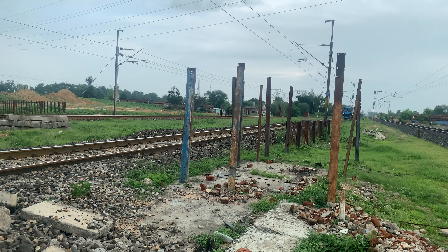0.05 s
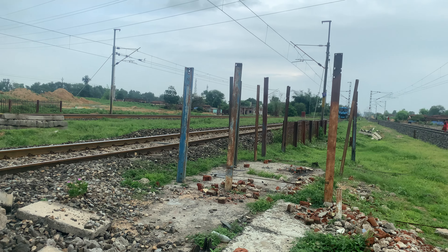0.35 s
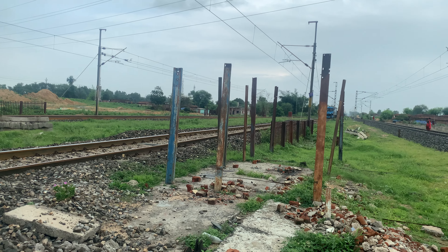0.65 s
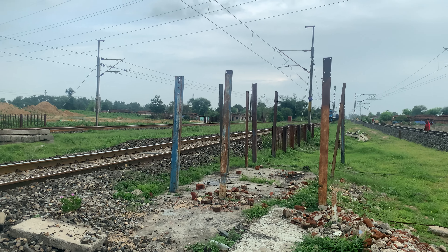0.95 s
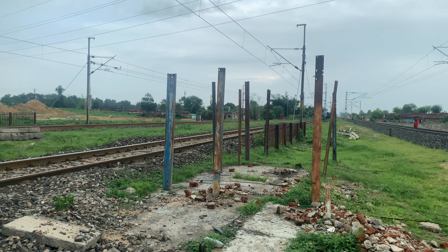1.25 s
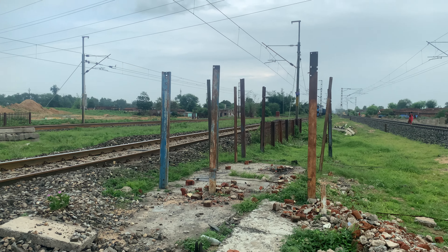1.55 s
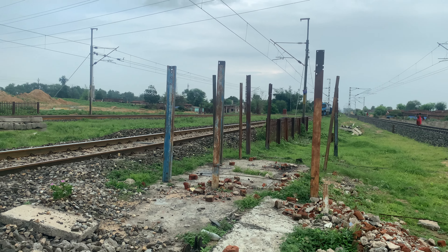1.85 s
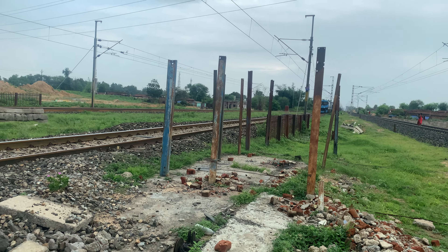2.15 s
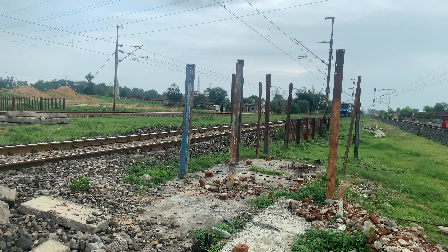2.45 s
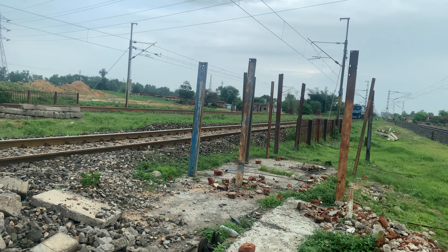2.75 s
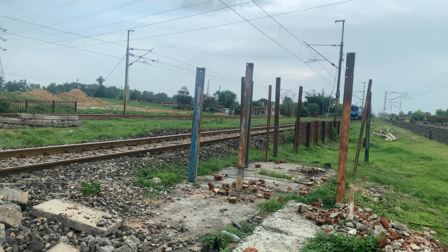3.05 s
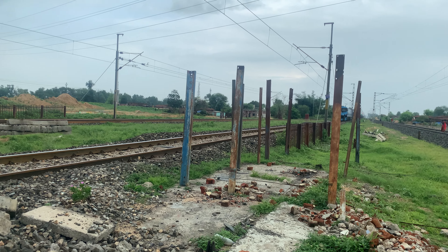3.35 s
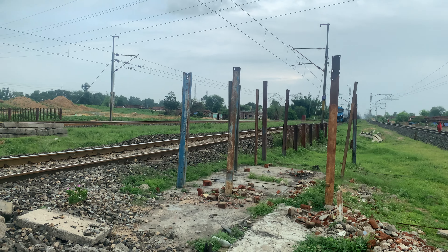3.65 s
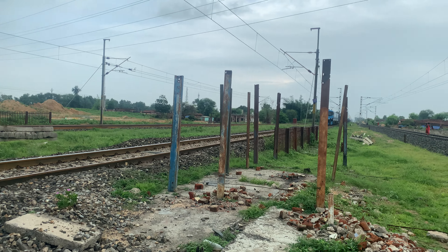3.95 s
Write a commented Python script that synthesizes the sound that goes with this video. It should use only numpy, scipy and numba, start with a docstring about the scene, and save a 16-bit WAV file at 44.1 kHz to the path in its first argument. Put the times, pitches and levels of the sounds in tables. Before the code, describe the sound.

A distant locomotive horn sounds one loud, steady blast across an open railway line, starting just past halfway and holding to the end. Before it, wind rumbles on the microphone, with faint gravel scuffs close by.

```python
"""On an open railway line, a distant locomotive sounds one long blast of its air horn. The diaphragm's
harmonics start sharp and settle; many paths through moving air make them fade and flutter, and three faint
notes sound beside them. Wind buffets the microphone, gravel scuffs close by, and faint chirps and tones come
from far off. A gain control turns all down when the horn arrives."""
import sys
import numpy as np
from scipy import signal
from scipy.fft import rfft, irfft
from scipy.io import wavfile
from scipy.ndimage import uniform_filter1d
from numba import njit

SR = 44100
rng = np.random.default_rng(int(sys.argv[2]) if len(sys.argv) > 2 else 0)


def put_to_file(sound):
    """Save the sound as 16-bit audio at rate SR, in the file named by the first command-line argument."""
    columns = np.atleast_2d(sound).T  # one column per channel
    safe = np.clip(columns, -1, 1)
    whole_steps = np.round(safe * 32767)
    wavfile.write(sys.argv[1], SR, whole_steps.astype(np.int16))


N = 176400
TIME = np.arange(N) / SR


def undb(db):
    """Decibels to amplitude ratio."""
    return 10 ** (np.asarray(db) / 20)


def curve(table, column=1):
    """Linear interpolation of a column in time."""
    rows = np.array(table, float)
    return np.interp(TIME, rows[:, 0], rows[:, column])


def at_hz(table, hz, column=1):
    """Interpolation of a column in log frequency."""
    rows = np.array(table, float)
    return np.interp(np.log(hz), np.log(rows[:, 0]), rows[:, column])


def shaped(gain):
    """Spectral shaping: white noise filtered by gain(Hz), at unit rms."""
    hz = np.maximum(np.arange(N // 2 + 1) * SR / N, 1)
    x = irfft(rfft(rng.standard_normal(N)) * gain(hz), N)
    return x / x.std()


def noise(spectrum):
    """Coloured noise with a tabulated spectrum, at unit rms."""
    return shaped(lambda hz: undb(at_hz(spectrum, hz)))


def walk(rate):
    """Low-pass random process that changes about rate times a second."""
    return shaped(lambda hz: np.exp(-(hz / rate) ** 2) / (1 + 2 * hz / rate))


def bursts(table, octaves):
    """Band noise under Gaussian envelopes; a row's width is the standard deviation."""
    out = np.zeros(N)
    for when, centre, width, db in table:
        band = shaped(lambda hz: (1 + (np.log2(hz / centre) / octaves) ** 2 / 4) ** -5)
        out += undb(db) * np.exp(-.5 * ((TIME - when) / width) ** 2) * band
    return out


def scatter(rate):
    """Rayleigh fading: many paths sum to a random amplitude and phase."""
    return (walk(rate) + 1j * walk(rate)) / np.sqrt(2)


def fading_tone(phase, fading, balance_db=0, lead=0):
    """Multipath interference: a tone fades and flutters at the two microphone ports."""
    fade_per_s, flutter_per_s = 8.1, 39
    shared = 1 + fading * (scatter(fade_per_s) + 0.73 * scatter(flutter_per_s))
    apart = fading * 0.44 * scatter(fade_per_s)
    side = np.array([[1], [-1]])
    ports = undb(side * balance_db / 2) * np.exp(1j * side * lead / 2)
    swell = undb(fading * 3 * walk(rate=4))
    tone = np.real(ports * (shared + side * apart) * np.exp(1j * phase))
    return swell * tone * np.sqrt(2 / (1 + fading ** 2))


# wind spectrum (frequency [Hz], relative density [dB])
WIND_SPECTRUM = [(20, -29.5), (35, -6.5), (58, 4), (110, -1.5), (180, -9.5), (300, -19), (500, -31.5),
                 (1000, -61.5), (4000, -89)]
# wind strength (time [s], relative level [dB])
WIND_STRENGTH = [(0, 2), (.17, 6.5), (.25, -6.5), (.34, 4), (.46, -3), (.52, 2.5), (.6, 1), (.72, 3),
                 (.98, -3.5), (1.09, 0.5), (1.32, -4.5), (1.42, 0), (1.53, -4.5), (1.66, 1), (1.81, -1.5),
                 (2.07, -8.5), (2.3, -3.5), (2.6, -5.5), (3.2, -4.5), (3.38, -0.5), (3.5, -4), (4, -3)]
# single buffets (time [s], centre [Hz], width [s], level [dB])
BUFFETS = [(.042, 234, 0.0095, -29.5), (.105, 152, 0.0082, -29), (.51, 150, 0.016, -35.5),
           (.695, 118, 0.034, -41), (1.19, 164, 0.0042, -36.5), (1.385, 90, 0.012, -28),
           (1.376, 240, 0.0037, -40), (1.645, 192.4, 0.006, -34), (3.3, 325, 0.0048, -43),
           (3.625, 130, 0.017, -30.5)]

def wind():
    """Turbulent pressure on the microphone gives a gusty rumble and single buffets."""
    gusts = undb(-36.5 + curve(WIND_STRENGTH) + 1.5 * walk(rate=57))
    return gusts * noise(WIND_SPECTRUM) + bursts(BUFFETS, octaves=0.88)


# murmur of open land (frequency [Hz], relative density [dB])
LAND_SPECTRUM = [(100, -10.5), (300, -25), (550, 0), (930, 8.5), (1250, -6.5), (2000, -7), (3200, -26),
                 (4500, -24.5), (6000, -33), (10000, -32.5), (15000, -49.5)]

def open_land():
    """A diffuse field: the far murmur is only weakly correlated between the ports."""
    apart = np.array([noise(LAND_SPECTRUM), noise(LAND_SPECTRUM)])
    level = undb(-62.5 + .5 * walk(rate=6))
    return level * (0.53 * noise(LAND_SPECTRUM) + 1.68 * apart)


# partials of a much farther horn (frequency [Hz], level [dB])
FAR_PARTIALS = [(322, -64.5), (644, -73), (964, -68)]

def far_horn():
    """Multipath fading makes a far horn's faint hum waver."""
    return sum(undb(db) * fading_tone(2 * np.pi * hz * TIME, fading=0.61) for hz, db in FAR_PARTIALS)


# nearby scuffs and ticks (time [s], centre [Hz], width [s], level [dB])
SCUFFS = [(0.084, 1490, 0.011, -60), (0.285, 1550, 0.094, -65), (0.46, 1700, 0.0035, -61),
          (0.493, 1700, 0.038, -65.5), (0.539, 3200, .003, -69), (0.678, 1430, 0.0045, -54),
          (0.756, 1250, 0.0097, -59), (1.036, 2150, .025, -73.5), (1.35, 1500, .012, -65.5),
          (1.571, 1080, 0.012, -54.5), (1.612, 1810, 0.014, -65), (1.782, 1400, 0.0044, -60),
          (2.171, 1710, 0.0012, -40.5), (3.292, 4970, 0.0025, -45)]

def gravel():
    """Granular friction: stones shift unevenly, each scuff with bright grit above it."""
    grit_hz, grit_db = 4400, -24.5
    grit = [(when, grit_hz, width, db + grit_db) for when, _, width, db in SCUFFS]
    return bursts(SCUFFS + grit, octaves=0.59) * undb(3.5 * walk(rate=470))


# chirps (time [s], centre [Hz], width [s], level [dB])
CHIRPS = [(.21, 2950, 0.016, -72), (.345, 2900, 0.016, -74), (.39, 3330, 0.046, -76),
          (.61, 3360, 0.045, -80)]

def birds():
    """Narrow-band noise is heard as pitch: short chirps of small, distant birds."""
    return bursts(CHIRPS, octaves=0.02)


# a distant glide (time [s], frequency [Hz], level [dB])
GLIDE = [(.7, 878, -71), (.95, 865, -62), (1.22, 781, -63), (1.42, 664, -64), (1.62, 570, -72),
         (1.75, 510, -92)]

def falling_tone():
    """A faint tone glides down; its phase is the integral of its frequency."""
    sounding = (TIME > GLIDE[0][0]) & (TIME < GLIDE[-1][0])
    phase = 2 * np.pi * np.cumsum(curve(GLIDE)) / SR
    return sounding * undb(curve(GLIDE, column=2)) * fading_tone(phase, fading=1.0)


# the horn's fundamental (time [s], frequency [Hz])
PITCH = [(2.26, 335), (2.298, 334), (2.335, 329.8), (2.36, 326.3), (2.39, 325.3), (2.53, 324.7),
         (2.63, 324.2), (2.79, 325), (2.97, 324.8), (3.25, 324.4), (3.75, 324.3), (4.0, 323.8)]
# envelopes of harmonics 2, 3 and 6 (time [s], relative level [dB])
SECOND = [(2.29, -13), (2.32, 6.5), (2.75, 0), (4, -2)]
THIRD = [(2.24, -61), (2.292, -33.5), (2.312, -15), (2.326, -8.5), (2.39, -7.5), (2.5, -10), (2.66, -9),
         (2.77, -13), (2.88, -8.5), (2.968, -13.5), (3.06, -9.8), (3.11, -11.5), (3.17, -9), (3.43, -7.5),
         (3.72, -8.5), (3.98, -12)]
SIXTH = [(2.298, -27), (2.322, 1), (2.89, -3), (2.97, -11), (3.16, 2.5), (3.44, 2.5), (3.64, -10),
         (3.7, -0.5)]
# other envelopes (time [s], fundamental [dB], harmonics 4, 5 and 7 [dB], 8 and above [dB])
BAND_ENVELOPES = [(2.296, -21.5, -27, -15.5), (2.324, -6, 4, 2), (2.39, -2.5, -4, 0.5), (2.5, -2, 1, 0.5),
                  (2.58, -16, -2.5, -1), (2.66, -8.5, -1.5, -0.5), (2.78, -3, -5, -5), (2.96, -4, 1, -4.5),
                  (3.16, 5.5, -3, 0), (3.29, -5.5, -1, 0), (3.43, 2.5, -0.5, -1.5), (3.58, 5.5, -3.5, -1),
                  (3.72, 7, -3.5, 4.5), (3.98, -0.5, -4, 2)]
# harmonics 1 to 15 (relative level [dB], left minus right [dB], fading depth [0-1])
HARMONICS = [(-34, 1, 0.28), (-30, -8, 0.03), (0, -4.5, 0.01), (-33, 2.5, 1), (-29, 0.5, 0.44),
             (-26, 1.5, 0.11), (-45.5, 4, 1), (-42.5, -0.5, 0.6), (-49, 2, 0.6), (-51, -6.5, 0.4),
             (-53, 1.5, 0.7), (-59, 11, 1), (-49.5, -0.5, 0.3), (-56, 0.5, 0.9), (-52, -5, 0.6)]
# phase differences of harmonics 1 to 15 (lead of the left port [rad])
PORT_LEADS = [-.2, -1.7, .6, -2.5, -1.7, -2.0, .4, -1.8, 1.9, 2.6, 1.0, 1.2, -.1, -.1, .1]
# higher harmonics (frequency [Hz], relative level [dB], left minus right [dB], left lead [rad])
UPPER_HARMONICS = [(4900, -54.5, 6.5, 4.5), (6016, -64, 0, 1.5), (6246, -52.5, 0, 7),
                   (6420, -50.5, -0.5, 8.5), (7050, -63.5, -3, 6), (8100, -54, -3, 9.5),
                   (7840, -54, -7, 7.5), (9500, -60, 3, 7.5), (10000, -59.5, -1, 4.5),
                   (11700, -72.5, 3, 2.5), (13000, -75.5, -6, 1.8), (14300, -78, 6.5, 1),
                   (15400, -74.5, 3.5, -5)]

def diaphragm():
    """Periodic vibration gives a harmonic series, here dominated by the third harmonic."""
    pitch = curve(PITCH) * (1 + 0.00029 * walk(rate=77))
    phase = 2 * np.pi * np.cumsum(pitch) / SR
    first, middle, treble = (undb(curve(BAND_ENVELOPES, column)) for column in (1, 2, 3))
    second, third, sixth = (undb(curve(table)) for table in (SECOND, THIRD, SIXTH))
    envelopes = [first, second, third, middle, middle, sixth, middle] + [treble] * 8
    out = np.zeros((2, N))
    for k, (db, balance_db, fading) in enumerate(HARMONICS):
        out += undb(db) * envelopes[k] * fading_tone((k + 1) * phase, fading, balance_db, PORT_LEADS[k])
    for k in range(len(HARMONICS) + 1, 48):
        db, balance_db, lead = (at_hz(UPPER_HARMONICS, k * PITCH[-1][1], column) for column in (1, 2, 3))
        out += undb(db) * treble * fading_tone(k * phase, 0.7, balance_db, lead)
    return out


# neighbouring horn notes (frequency [Hz], relative level [dB])
SIDE_NOTES = [(687, -54.5), (916, -42.5), (1034, -46)]

def side_notes():
    """Faint notes beside the main one undergo deep multipath fading."""
    return sum(undb(db - 1.5) * fading_tone(2 * np.pi * hz * TIME, fading=0.98, balance_db=-2, lead=0.62)
               for hz, db in SIDE_NOTES)


# air and scattered sound round the note (frequency [Hz], relative density [dB])
RUSH_SPECTRUM = [(150, -25.5), (450, -28.5), (700, -19.5), (970, -1), (1180, -11), (1450, -17.5),
                 (1850, -15), (2400, -26.5), (3200, -37.5), (4400, -25.5), (5700, -37), (8600, -24),
                 (11000, -39.5), (15000, -52)]

def air_rush():
    """Airflow and scattering give broadband noise, half its power common to both ports."""
    shared = noise(RUSH_SPECTRUM)
    apart = np.array([noise(RUSH_SPECTRUM), noise(RUSH_SPECTRUM)])
    return undb(-45) * (shared + apart) / np.sqrt(2)


def air_horn():
    """Amplitude modulation: the valve admits the note; side notes and rush follow its strength."""
    opens_s, opening_s = 2.235, 0.05
    valve = np.clip((TIME - opens_s) / opening_s, 0, 1) ** 2
    blowing = np.minimum(undb(curve(THIRD) + 9), 1)
    return valve * (diaphragm() + blowing * (side_notes() + air_rush()))


# noise at the note's onset (time [s], centre [Hz], width [s], level [dB])
ONSET_BURSTS = [(2.27, 5060, 0.028, -60.5), (2.328, 4900, 0.0058, -57)]

def onset_noise():
    """A soft hiss leads into the note as the valve opens, and a brief bright burst sounds at 2.33 s."""
    return bursts(ONSET_BURSTS, octaves=0.59)


def scene():
    """Superposition: the horn adds to the sounds of the open line."""
    horn = air_horn() + onset_noise()
    return horn + wind() + gravel() + birds() + far_horn() + falling_tone() + open_land()


@njit
def gain_control(peak, threshold, step, floor, wait):
    """Feedback: a peak over the threshold lowers the gain one step after a wait, down to a floor."""
    out, gain, waited = np.empty(len(peak)), 1., 0.
    for i in range(len(peak)):
        if waited > 0 or peak[i] * gain > threshold:
            waited += 1
        if waited > wait:
            gain, waited = max(gain * step, floor), 0.
        out[i] = gain
    return out


def record(dry):
    """Compression and band limiting: the gain steps down under the horn and the top treble is cut."""
    threshold, step, floor = undb([-9.5, -2.75, -8])
    wait_s, slew_s, cutoff_hz = .021, .0007, 15500
    gain = gain_control(np.abs(dry).max(axis=0), threshold, step, floor, wait_s * SR)
    gain = uniform_filter1d(gain, size=int(slew_s * SR))
    low_pass = signal.ellip(8, .2, 70, cutoff_hz, fs=SR, output="sos")
    return signal.sosfilt(low_pass, dry * gain)


dry = scene()
out = record(dry)
put_to_file(out)
```